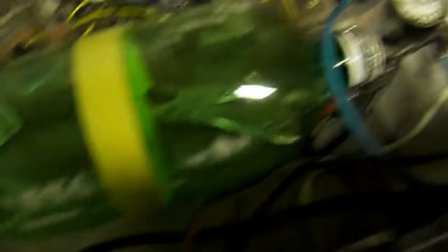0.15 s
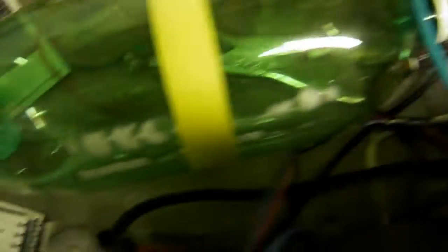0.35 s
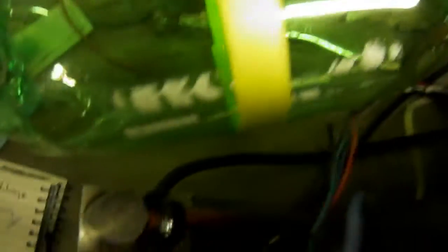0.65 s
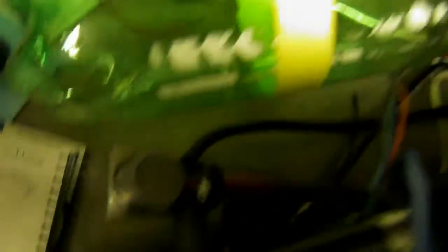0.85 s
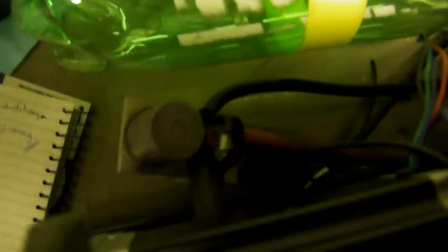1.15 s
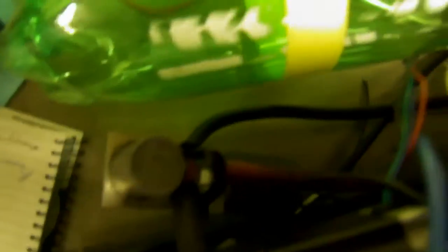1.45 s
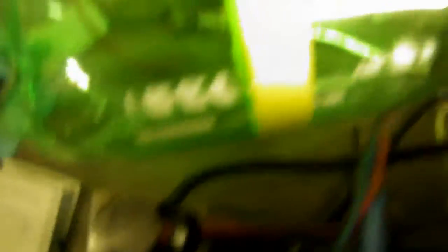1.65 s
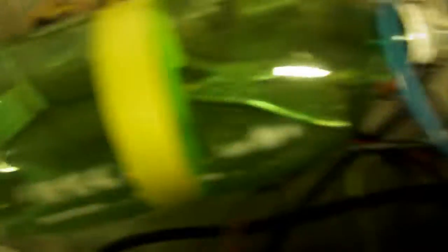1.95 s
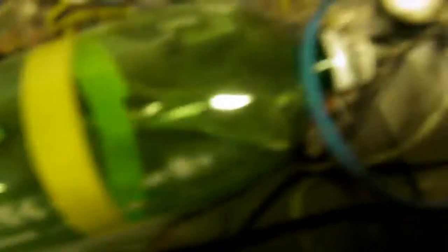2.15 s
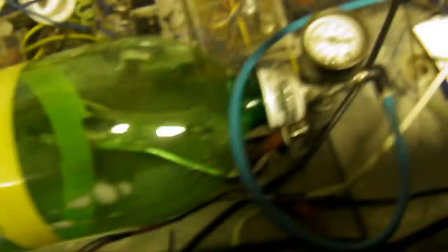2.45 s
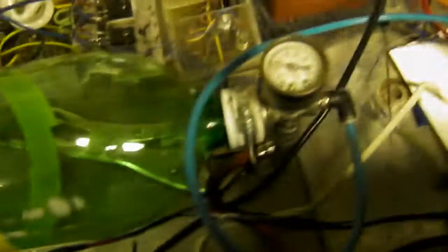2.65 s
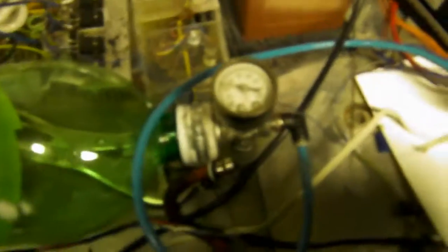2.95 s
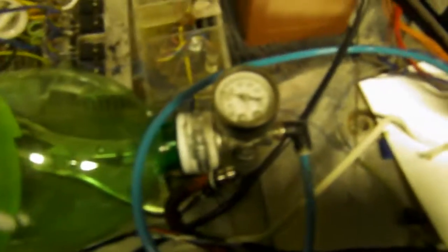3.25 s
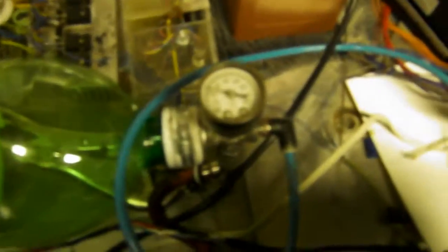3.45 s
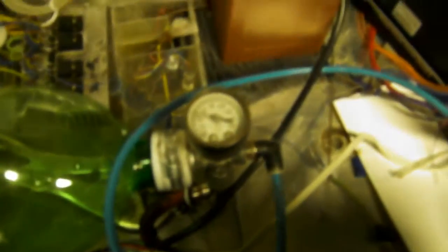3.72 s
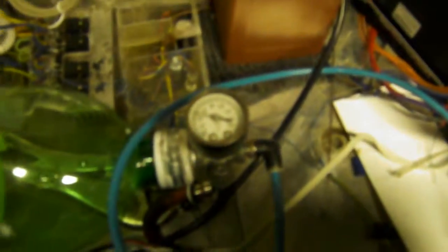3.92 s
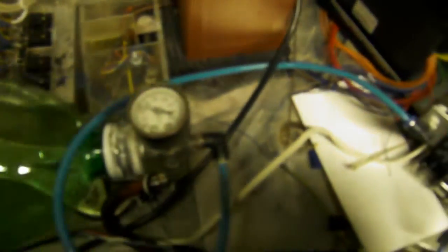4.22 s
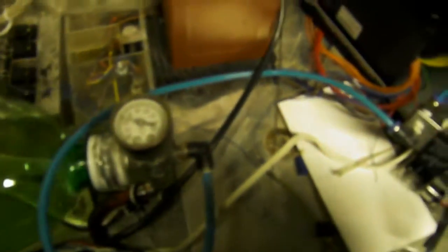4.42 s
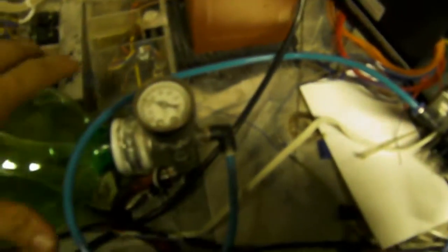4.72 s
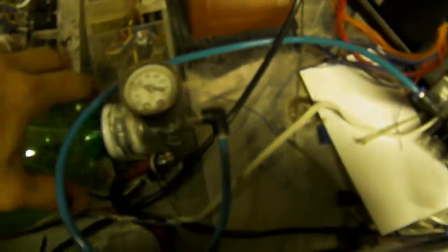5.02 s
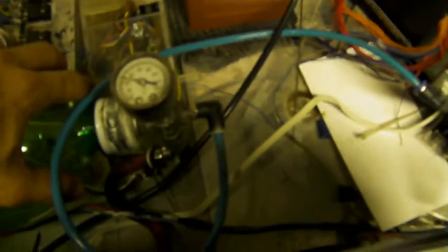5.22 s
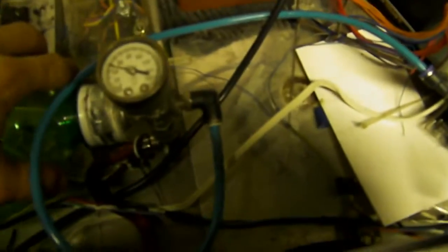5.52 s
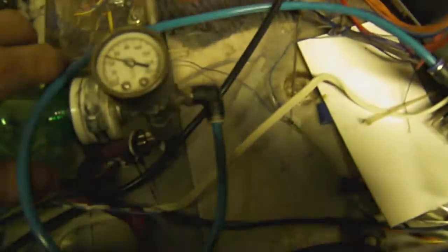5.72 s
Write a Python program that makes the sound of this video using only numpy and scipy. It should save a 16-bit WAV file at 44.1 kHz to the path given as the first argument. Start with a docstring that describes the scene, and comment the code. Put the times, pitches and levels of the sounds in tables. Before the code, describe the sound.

Close by on an indoor workbench, a tiny air pump drones as a harsh, dense clatter with a steady low pitch. Beneath is dull rumbling noise; above, bright valve hiss and metal rattle. A thin metallic whine comes forward near the cap, swelling around two and a half seconds. The moving microphone changes the colour, then a shaded position softens the puffs and whine. The motor keeps going to the end.

```python
"""On a workbench, close up: a small piston air compressor runs steadily, pumping up a plastic bottle.
Each crank turn gives a low puff (pulses and a noise rush), a rattle (clicks, noise bursts, ringing modes),
a falling chirp from the cylinder (a gliding resonance) and spurts of hiss (gated noise).
The bottle sings a rising note, a metal part rings as a wavering sine, and dull noise lies beneath.
The microphone starts over the cap, dips beside the bottle, returns past cap and gauge, and ends shaded."""
import sys
import numpy as np
from scipy import signal
from scipy.fft import rfft, irfft
from scipy.io import wavfile
from scipy.ndimage import uniform_filter1d

SR = 44100
rng = np.random.default_rng(int(sys.argv[2]) if len(sys.argv) > 2 else 0)


def digitize_waveform(pressure):
    """Quantize a signal to 16-bit integers and store it at the path in sys.argv[1].

    Rows of a 2-D input are taken as channels; values are limited to [-1, 1].
    """
    field = np.atleast_2d(pressure).T
    bounded = np.clip(field, -1, 1)
    quanta = np.round(bounded * 32767).astype(np.int16)
    wavfile.write(sys.argv[1], SR, quanta)


N = 258855  # length in samples

# path of the microphone: (time [s], place [0 beside the bottle, 1 its neck, 2 over its cap, 3 gauge, 4 shaded])
MICROPHONE_PATH = [(0, 2), (.2, 0.87), (.5, 0.14), (1.6, 0), (1.9, 1.5), (2.35, 2), (2.95, 2.5), (3.25, 3),
                   (3.97, 3), (4.2, 4)]
# loudness of the puffs at the five places, in that order: (level [dB])
PUFF_LEVELS = [-32.5, -31, -27.5, -28.5, -34]


def rattle(turns, hiss_db=1, clack_db=-2.0, room_db=-13, room_t60=0.21, low_hz=700):
    """Blows, clack, chirp and hiss, with the room's answer; small parts give no bass."""
    # loudness of the chirp, then of the whole rattle, at the five places: (level [dB])
    chamber_levels = [-10, -5, -10.5, -7.5, -8]
    rattle_levels = [-15, -14.5, -14.5, -14.5, -16]
    # colour of the rattle at each place: (frequency [Hz], level [dB])
    beside_bottle = [(1100.0, -13), (1380.0, -18.5), (2190.0, -3.5), (2860.0, -21), (3470.0, 2.5),
                     (3890.0, -6), (4890.0, -2.5), (5700.0, 0.5), (6640.0, -8.5), (7450.0, -2.5),
                     (8350.0, -9), (13200.0, -23.5), (14300.0, -15), (15400.0, -23)]
    at_neck = [(1100.0, -6), (1330.0, -12.5), (1550.0, -4), (1740.0, 0.5), (2650.0, -4), (3340.0, 0),
               (3740.0, 0), (6150.0, 2.5), (7450.0, 0), (8040.0, -0.5), (13200.0, -14), (14300.0, -6),
               (14800.0, -17), (15400.0, -6)]
    over_cap = [(1100, -6), (1330, -8), (1740, -2), (2190, -1.5), (2860, -4.5), (3340, -9.5), (4200, -9),
                (5300, -0.5), (6150, 1.5), (7450, -7.5), (8400, -3), (11800, -13), (13200, -17),
                (14200, -2), (15400, -15)]  # hollow in the upper middle, bright at the very top
    over_gauge = [(1100.0, -10.0), (1330.0, -12), (1550.0, -8.5), (1740.0, -6), (2190.0, -2.5),
                  (2860.0, -1.5), (3340.0, -13.5), (4200.0, -11.5), (5480.0, -2), (5700.0, 1), (7450.0, -6),
                  (11800.0, -12.5), (12700.0, -3.5), (15400.0, -12)]
    shaded = [(1100.0, -12.5), (1490.0, -16.5), (2550.0, -10), (2970.0, -12.5), (5280.0, -1.5), (5700.0, 0),
              (6640.0, -1), (9370.0, -2.5), (11800.0, -9), (12200.0, -7), (13200.0, -10), (14300.0, -8.5),
              (14800.0, -6.5), (15400.0, -20)]

    near = blows(turns) + gain_of(hiss_db) * hiss(turns) + gain_of(clack_db) * clack(turns)
    near = near + gain_of(heard_db(chamber_levels)) * chamber(turns)
    sound = near + gain_of(room_db) * echo(near, tail(room_t60, delay_s=0.006))
    no_bass = signal.butter(4, low_hz, "high", fs=SR, output="sos")
    sound = signal.sosfilt(no_bass, sound)
    heard = at_microphone(sound, [beside_bottle, at_neck, over_cap, over_gauge, shaded])
    return gain_of(heard_db(rattle_levels)) * heard


def clack(turns, tick_db=-7, t60=0.016, lead_db=-7, bounce_db=-4, seat_db=-1, seat_t60=.012):
    """The outlet valve stutters, slams on its seat at the top of each stroke and bounces once."""
    # strength of the slam at the five places, against the bounce: (level [dB])
    clack_levels = [3.5, 0.5, -0.5, -1, 5]
    # colour of the clack: (frequency [Hz], level [dB])
    clack_colour = [(1000, -15), (2800, -23.5), (3600, -0.5), (4600, -19.5), (5350, -1), (5800, -3),
                    (6250, -5.5), (6900, -19.5), (11000, -3), (15500, -10.5)]
    # it slams harder on every other turn, and more so as the pressure builds
    swing_start_db, swing_db_per_s = 1, 0.32

    stutter = gain_of(lead_db) * clicks(turns, .115, .3, 2)
    slam = clicks(turns, .165, .1, 1) + stutter
    swing_db = swing_start_db + swing_db_per_s * np.arange(N) / SR
    alternation = np.cos(np.pi * turns)  # changes sign from one turn to the next
    ticks = slam * gain_of(heard_db(clack_levels) + swing_db * alternation)
    ticks = ticks + gain_of(bounce_db) * clicks(turns, .44, .1, 2)
    seat = gain_of(seat_db) * echo(ticks, tail(seat_t60, delay_s=0))
    return evened(colour(gain_of(tick_db) * ticks + shudder(ticks, t60) + seat, clack_colour))


def blows(turns, chatter_db=-2, chatter_t60=0.023, casing_db=3, casing_t60=0.023):
    """Rod and reeds knock: a tick, some chatter, the casing's short answer and the pump head's modes."""
    # lesser blows within one turn: (place in the turn [0-1], level [dB], timing scatter [ms])
    blow_rows = [(0.089, -1.5, 0.503), (.14, -7.5, 0.458), (0.256, 1.5, 0.11), (0.329, -6, 0.413),
                 (.44, -0.5, 0.052), (.71, -3.5, 0.302), (.92, -5, .3)]
    # modes of the pump head: (frequency [Hz], relative level [dB], t60 [s])
    head_modes = [(2220, -2.5, 0.031), (2424, -2.5, 0.028), (2699, -7.5, 0.063), (5722, -5, 0.061)]
    # strength of those modes at the five places: (level [dB])
    head_levels = [-7.5, -6, -8.5, -8.5, -8.5]
    uneven_db = 1.2  # spread of strength from turn to turn

    ticks = sum(gain_of(db) * clicks(turns, place, ms, uneven_db) for place, db, ms in blow_rows)
    chatter = gain_of(chatter_db) * shudder(ticks, chatter_t60)
    casing = gain_of(casing_db) * echo(ticks, tail(casing_t60, delay_s=0.00023))
    knock = ticks + chatter + casing

    t = np.arange(SR // 8) / SR
    head = sum(gain_of(db - 60 * t / t60) * np.cos(2 * np.pi * hz * t) for hz, db, t60 in head_modes)
    ringing = echo(knock, head / np.linalg.norm(head))
    return evened(knock + gain_of(heard_db(head_levels)) * ringing)


def shudder(ticks, t60):
    """Each tick becomes a very short burst of metal chatter of like energy."""
    envelope = gain_of(-60 * np.arange(SR // 20) / SR / t60)
    return rng.standard_normal(N) * echo(ticks, envelope / np.linalg.norm(envelope))


def chamber(turns, width_hz=200, rush_db=-4, octave_db=-3):
    """Valve kicks and rushing air ring the growing cylinder: one falling chirp a turn, with its octave."""
    # the air rings lower as the piston withdraws: (place in the turn [0-1], pitch [Hz], rush level [dB])
    chamber_rows = [(0, 3130, -33), (.15, 2830, -21), (.27, 2590, -0.5), (.45, 2266, -0.5), (.7, 2114, -2),
                    (.9, 1980, -9), (1, 1830, -18)]
    # valve kicks that set that air ringing: (place in the turn [0-1], level [dB])
    kick_rows = [(.14, 3.5), (.3, -2.5), (.45, -7), (.68, -3)]
    kick_scatter_ms = 0.053

    places, pitch, rush_levels = np.transpose(chamber_rows)
    hz = np.interp(turns % 1, places, pitch)
    rush_envelope = gain_of(np.interp(turns % 1, places, rush_levels))
    rush = evened(rng.standard_normal(N) * rush_envelope)
    kicks = sum(gain_of(db) * clicks(turns, place, kick_scatter_ms, 1.5) for place, db in kick_rows)
    drive = gain_of(rush_db) * rush + evened(kicks)
    octave = resonate(drive, 2 * hz, width_hz)
    return evened(resonate(drive, hz, width_hz) + gain_of(octave_db) * octave)


def hiss(turns, leak_db=-9, flutter_db=2.74):
    """Air spurts through the valves over a steady leak: noise under bell-shaped gates, fluttering."""
    # spurts within one turn: (place in the turn [0-1], width [turns], level [dB])
    spurt_rows = [(.15, 0.071, -6.5), (.42, 0.042, -11), (.73, 0.35, -6)]

    gate = gain_of(leak_db)
    for place, width, db in spurt_rows:
        distance = (turns - place + .5) % 1 - .5  # turns to the nearest spurt
        gate = gate + gain_of(db) * np.exp(-.5 * (distance / width) ** 2)
    return evened(rng.standard_normal(N) * gate * gain_of(flutter_db * wander(150)))


def puffs(turns, second_db=-16, swing_db=0.8, rush_db=-16, rush_turns=0.58, room_db=-17):
    """The piston gulps air once a turn: a pulse, a weak rebound and a short rush."""
    # colour of the puffs at each place: (frequency [Hz], level [dB])
    beside_bottle = [(123, -25), (164, -16.5), (205, -20.5), (246, -7), (328, 3), (410, -4), (451, -42),
                     (492, -10), (574, 2.5), (697, 0), (779, -40), (1107, -7.5), (1271, -9), (2000, -20)]
    at_neck = [(123, -28), (164, -16.5), (205, -20.5), (246, -10.5), (328, 1), (410, -4.5), (492, -22.5),
               (574, -13.5), (656, 3), (779, -5.5), (984, -16), (1107, -30), (1271, -7.5), (2000, -61)]
    over_cap = [(123, -29), (164, -19), (205, -24), (246, -10.5), (328, -2), (410, 0), (451, -20),
                (574, -9), (697, -3), (840, 0.5), (943, -15), (1066, -18), (1230, -11), (2000, -35)]
    over_gauge = [(123, -31), (164, -20), (205, -21), (246, -9.5), (328, -3), (410, -2.5), (451, -22),
                  (574, -6.5), (697, -3.5), (861, 4.5), (943, -5), (1066, -18), (1230, -6.5), (2000, -28.5)]
    shaded = [(123, -31), (164, -22.5), (205, -23.5), (246, -13), (328, -7.5), (410, -10), (451, -15.5),
              (574, -9.5), (697, -10), (861, 0.5), (943, -16.5), (1066, -36), (1230, -9), (2000, -27)]

    place = .64  # of the gulp within the turn
    rebound = gain_of(second_db) * clicks(turns, place + .2, .15, 3)
    pulses = clicks(turns, place, .04, .8) + rebound
    swing = gain_of(swing_db * np.cos(np.pi * (turns - place)))  # every other puff is stronger
    rush = rng.standard_normal(N) * np.exp(-((turns - place) % 1) / rush_turns)
    air = evened(pulses * swing) + gain_of(rush_db) * evened(rush)
    air = air + gain_of(room_db) * echo(air, tail(t60=0.21, delay_s=0.0012))
    heard = at_microphone(air, [beside_bottle, at_neck, over_cap, over_gauge, shaded])
    return gain_of(heard_db(PUFF_LEVELS)) * heard


def bottle(turns, width_hz=42):
    """Each stroke nudges the bottle's narrow resonance, which climbs as pressure stiffens the wall."""
    # loudness of the note at the five places: (level [dB])
    bottle_levels = [-41, -33, -40.5, -42, -40]
    start_hz, rise_hz_per_s = 803, 13.2

    hz = start_hz + rise_hz_per_s * np.arange(N) / SR
    note = resonate(clicks(turns, .5, .05, 1.5), hz, width_hz)
    strength = np.sqrt(abs(uniform_filter1d(note ** 2, SR // 5)) + 1e-20)  # rms over 0.2 s
    return gain_of(heard_db(bottle_levels)) * note / strength


def ring(waver_db=2.0, drift_hz=3):
    """One narrow metal resonance sings on: a sine that drifts and wavers, and swells once."""
    # loudness of the ringing at the five places: (level [dB])
    ring_levels = [-49, -43, -31, -29.5, -45.5]
    ring_hz = 1801
    swell_at_s, swell_width_s, swell_db = 2.48, .11, 7.5

    hz = ring_hz + drift_hz * wander(18)
    swell = swell_db * np.exp(-.5 * ((np.arange(N) / SR - swell_at_s) / swell_width_s) ** 2)
    level_db = heard_db(ring_levels) + swell + waver_db * wander(24)
    return gain_of(level_db) * evened(np.sin(2 * np.pi * np.cumsum(hz) / SR))


def wash(level_db=-15.0):
    """Dull noise of the shaking bench and the room, its level moving with the puffs' from place to place."""
    # colour of the wash: (frequency [Hz], level [dB])
    wash_colour = [(20, -6), (80, -5.5), (160, -2.5), (300, 2.5), (480, 7.5), (800, 4), (1100, -23),
                   (1600, -29)]
    noise = evened(colour(rng.standard_normal(N), wash_colour))
    return gain_of(heard_db(PUFF_LEVELS) + level_db) * noise


def heard_db(levels):
    """A part's level at every sample, as the microphone moves from place to place."""
    return np.interp(curve(MICROPHONE_PATH), np.arange(len(levels)), levels)


def at_microphone(x, colours):
    """Blends the colours of neighbouring places, each at rms 1, as the microphone moves."""
    place = np.clip(curve(MICROPHONE_PATH), 0, len(colours) - 1)
    heard = 0
    for k, points in enumerate(colours):
        nearness = np.maximum(1 - abs(place - k), 0)
        heard = heard + nearness * evened(colour(x, points))
    return heard


def clicks(turns, place, scatter_ms, uneven_db, count=246, size=8):
    """One band-limited click a turn, each a little off in time and strength."""
    late, strong = rng.uniform(-1.01, 1, (count, 2)).T
    on_time = np.interp(np.arange(count) + place, turns, np.arange(N), right=2 * N)
    at = on_time + late * scatter_ms * SR / 10 ** 3
    # a windowed sinc sets each click between samples
    index = at.astype(int)[:, None] + np.arange(-size, size + 1)
    offset = index - at[:, None]
    shape = gain_of(uneven_db * strong)[:, None] * np.sinc(offset) * np.sinc(offset / (size + 1))
    inside = (index >= 0) & (index < N)
    return np.bincount(index[inside], shape[inside], N)


def resonate(x, hz, width_hz):
    """A resonance that follows the curve hz: shift it down to zero, smooth twice, shift back."""
    spin = np.exp(2j * np.pi * np.cumsum(hz) / SR)
    r = np.exp(-np.pi * width_hz / SR)
    smoothed = signal.lfilter([(1 - r) ** 2], [1, -2 * r, r * r], x / spin)
    return (spin * smoothed).real


def tail(t60, delay_s):
    """Dense reflections that die away: decaying noise of energy 1, silent before the delay."""
    t = np.arange(SR // 2) / SR
    taps = rng.standard_normal(len(t)) * gain_of(-60 * t / t60) * (t >= delay_s)
    return taps / np.linalg.norm(taps)


def echo(x, taps):
    """Convolves and keeps the length."""
    return signal.oaconvolve(x, taps)[:N]


def colour(x, points, size=4096):
    """Minimum-phase filter with the given spectrum, its phase taken from the log gain."""
    f, db = np.transpose(points)
    hz = abs(np.fft.fftfreq(size, 1 / SR))
    log_gain = np.log(gain_of(np.interp(np.log(hz + 1), np.log(f + 1), db)))
    taps = np.fft.ifft(np.exp(np.conj(signal.hilbert(log_gain)))).real
    return echo(x, taps[:size // 2])


def wander(below_hz):
    """Slow random curve of rms 1: noise with only the rates below the limit kept."""
    spectrum = rfft(rng.standard_normal(N))
    slow = np.fft.rfftfreq(N, 1 / SR) < below_hz
    return evened(irfft(spectrum * slow, N))


def curve(rows):
    """A table of (time [s], value) at every sample."""
    return np.interp(np.arange(N) / SR, *np.transpose(rows))


def evened(x):
    """Scales to rms 1."""
    return x / np.sqrt(np.mean(x ** 2) + 1e-20)


def gain_of(db):
    """Decibels to a factor."""
    return 10 ** (np.asarray(db) / 20)


def scene():
    """One crank times the puffs, bottle and rattle; the ring and the wash run on beside them."""
    # crank speed: (time [s], speed [turns/s])
    crank_speed = [(0.0, 40.92), (0.5, 41.072), (1.2, 41.115), (1.8, 40.962), (2.4, 40.907), (2.9, 41.015),
                   (3.4, 40.932), (3.9, 40.957), (4.4, 41.07), (5.0, 41.09), (5.5, 41.141), (5.65, 41.24),
                   (5.87, 41.117)]
    # the beat hurries ahead once: (time [s], turns gained [turns])
    hurry = [(5.665, 0), (5.695, .145)]
    turns = np.cumsum(curve(crank_speed)) / SR + curve(hurry)
    return (rattle(turns) + puffs(turns) + bottle(turns) + ring() + wash())[None]


def record(dry, notch_hz=7880, notch_q=30, edge_hz=15850):
    """The microphone has one narrow notch; then the band limit."""
    notched = signal.lfilter(*signal.iirnotch(notch_hz, notch_q, SR), dry)
    band_limit = signal.firwin(511, edge_hz, window=("kaiser", 9), fs=SR)
    return signal.oaconvolve(notched, band_limit[None], "same")


dry = scene()
out = record(dry)
digitize_waveform(out)
```